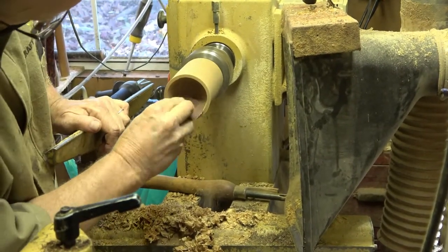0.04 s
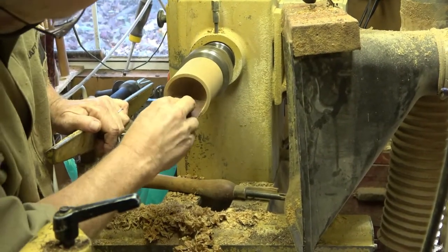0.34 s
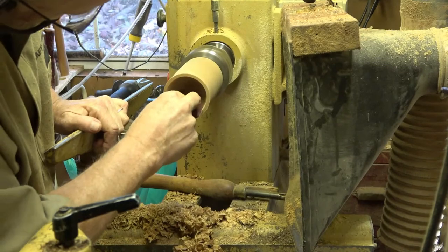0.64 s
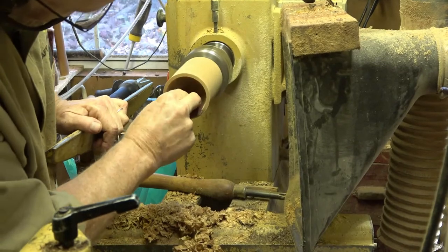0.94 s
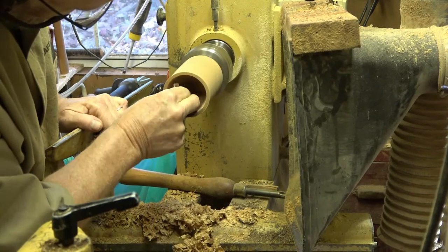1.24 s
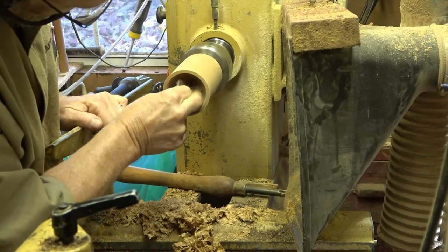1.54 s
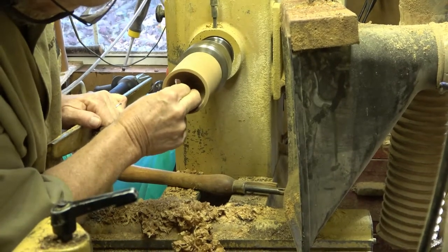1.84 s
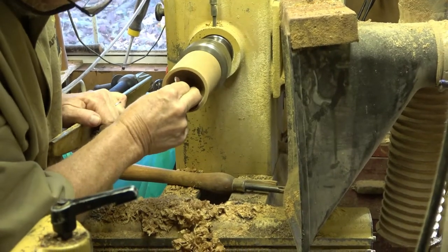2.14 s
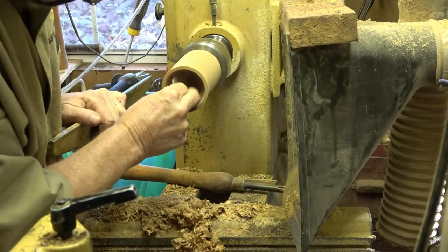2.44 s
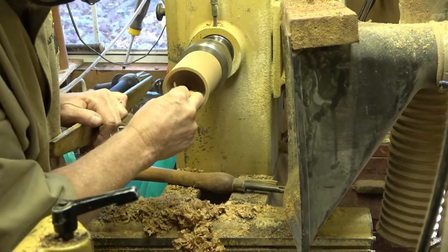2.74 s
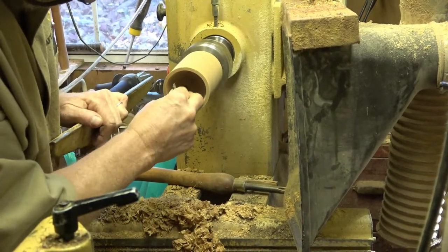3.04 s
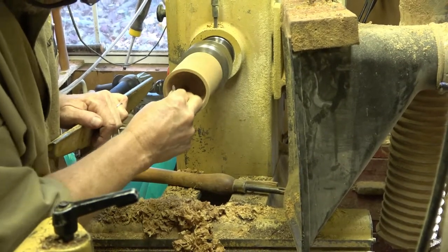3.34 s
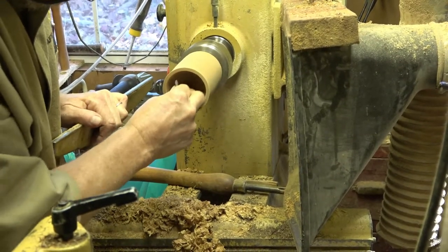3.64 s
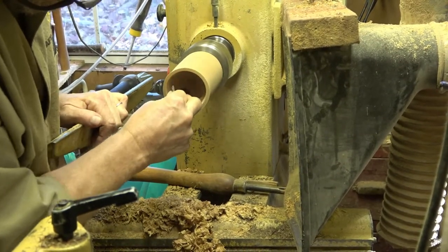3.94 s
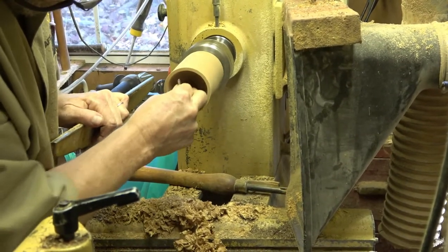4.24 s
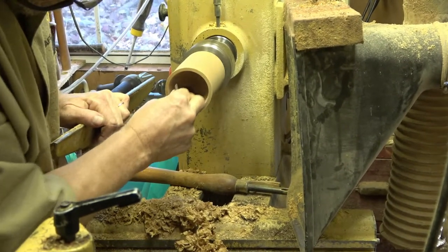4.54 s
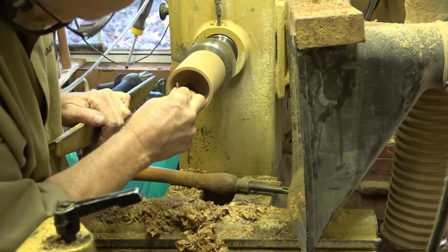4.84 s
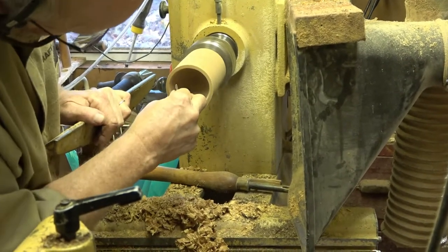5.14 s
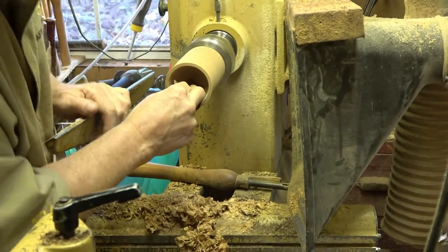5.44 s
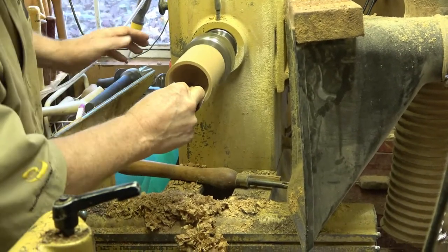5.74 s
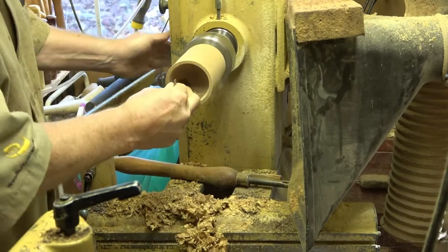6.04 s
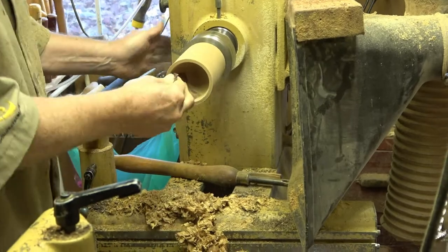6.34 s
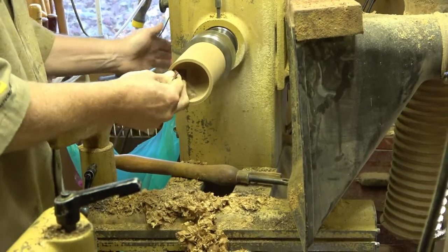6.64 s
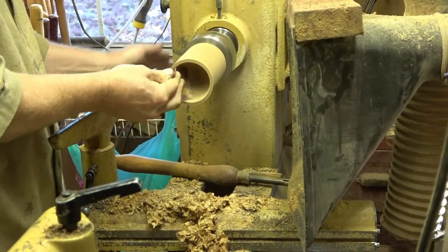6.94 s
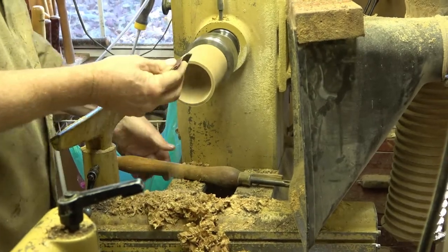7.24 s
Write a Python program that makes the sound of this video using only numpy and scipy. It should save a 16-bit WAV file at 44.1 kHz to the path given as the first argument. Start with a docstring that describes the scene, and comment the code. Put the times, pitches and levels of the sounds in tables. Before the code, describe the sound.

Folded sandpaper presses against a hollow wooden cup spinning on a lathe, making a loud, steady, gritty hiss. The thin wall rings and the tone turns throatier as the paper reaches inside, with a few brief judders when it catches. Near the end a hand knocks softly on the machine and the paper lifts off. A faint motor hum, high whine and rush of air run underneath, heard close in a small workshop.

```python
"""A gritty, hollow hiss: folded sandpaper held against a wooden cup spinning on a lathe.
The grit rings the thin wall and the air in the bore, and the paper judders when it catches inside.
Near the end the free hand knocks softly on the machine and the paper lifts off.
Under it run the lathe's motor, the whine of its speed drive and a rush of air, in a small workshop."""
import sys
import numpy as np
from scipy import signal
from scipy.fft import rfft, irfft, next_fast_len
from scipy.io import wavfile

SR = 44100
rng = np.random.default_rng(int(sys.argv[2]) if len(sys.argv) > 2 else 0)


def store_pcm(level_fs):
    """Save levels as 16-bit WAV."""
    pcm = np.round(np.clip(level_fs, -1, 1) * 32767).astype(np.int16)
    wavfile.write(sys.argv[1], SR, np.atleast_2d(pcm).T)


N = 330307
FFT_SIZE = next_fast_len(N + SR // 4, real=True)
T, HZ = np.arange(N) / SR, np.fft.rfftfreq(FFT_SIZE, 1 / SR)
BITE_S = 0.07  # paper pressed onto the wood

# where the paper bears: (time [s], reach [0 lip .. 1 deep inside])
PAPER_REACH = [(0, 0), (.5, 0.11), (.8, 1), (1.4, 0.94), (1.75, 0.83), (2.1, 0.47), (2.6, 0.54),
               (4.6, 0.48), (4.9, 0.29), (5.2, 0.0097), (5.55, 0.13), (5.9, 0.13), (7.2, 0.25)]
# hiss under the hand's force: (time [s], relative level [dB])
HAND_FORCE = [(0.1, -21.5), (1.3, -20), (1.59, -23), (1.71, -18.5), (1.73, -20), (2.0, -22), (2.33, -23.5),
              (2.58, -19.5), (2.95, -21), (3.05, -20), (3.09, -22), (3.61, -19.5), (3.85, -20),
              (5.13, -20.5), (5.24, -22.5), (5.32, -20), (5.89, -22), (7.07, -20.5)]
# finest hiss: (frequency [Hz], relative level [dB])
FINE_SPECTRUM = [(4000, -32), (6500, 2.5), (8000, 2), (10000, 0), (11000, -4.5), (12500, -7), (14000, -15),
                 (16000, -25)]
# thin wall: (frequency [Hz], width [Hz], relative level [dB])
WALL_MODES = [(2153, 170, -2), (2448, 60, -2.5), (1917, 40, -8.5), (2080, 40, -8), (2774, 123, -6)]
def sanding():
    """Grit hisses and rings the cup; each push rings wall and bore, fills the hiss and dulls its top."""
    force_db, = curves(HAND_FORCE)
    reach, = curves(PAPER_REACH)
    firmness, wall_ring, bore_ring, dull_db = pushes()
    ease_db = -9 * ramp(7.092, 0.042)  # the hand eases off
    build_db = -5 * (1 - ramp(BITE_S, 0.07))
    full = hiss(reach)
    treble = filtered(full, highpass(2870))
    body = (full - treble) * undb(-0.5 * (1 - firmness))
    coarse = (treble + body) * undb(force_db + ease_db + 1.41)
    fine_db = -23 - reach + ease_db + build_db - dull_db  # 1 dB less deep inside
    fine = shape(grit(patchy_db=2.0), undb(over_hz(FINE_SPECTRUM))) * undb(fine_db)
    wall = shape(grit(patchy_db=2.0), peaks(WALL_MODES)) * np.hypot(wall_ring, undb(-41.5 + ease_db))
    scrape = fold(scrape_db=-41 + 2.5 * firmness + ease_db)
    hollow = bore(width_hz=140.5, patchy_db=0.9) * np.hypot(bore_ring, undb(-33 + 3 * reach))
    return (coarse + fine + wall + scrape + hollow) * pressure()


# grit on wood: (frequency [Hz], relative level [dB])
HISS_SPECTRUM = [(1400, -32.5), (1850, -9.5), (2300, -2.5), (2650, 0), (3300, 1), (4500, 0), (5600, 0.5),
                 (7000, -3.5), (7900, -1.5), (9000, -7.5), (12000, -20.5)]
# cup overtones, fingers on the lip, in the bore, deep inside: (frequency [Hz], width [Hz], gain [dB])
LIP_MODES = [(2590, 89, 0), (3130, 61, 4.5), (3308, 91, 4.5), (3960, 40, -2), (3920, 56, 7), (4390, 88, 5),
             (4750, 60, 3), (5260, 96, 6.5), (5720, 80, -4), (6080, 170, 6), (6670, 160, 4)]
BORE_MODES = [(2740, 64, -8), (3180, 120, -5.5), (3430, 43, -2), (3700, 62, 4), (3990, 66, -2),
              (4160, 80, -5.5), (4540, 76, -1), (4880, 84, -1), (5790, 91, -1.5), (6140, 70, -1)]
DEEP_MODES = [(2760, 98, -8), (3260, 93, 2.5), (3690, 55, 4), (3870, 45, 1), (4140, 90, 7.5), (4450, 90, 1),
              (4960, 70, -8), (5300, 71, 0), (5970, 41, -8), (6830, 55, -2)]
def hiss(reach):
    """Grit through the cup's overtones: bright on the lip, throatier as the paper reaches in."""
    octaves = np.log2((HZ + 500) / 4000)
    out = 0
    for place, modes, tilt_db in (0, LIP_MODES, 0), (0.5, BORE_MODES, -1.36), (1, DEEP_MODES, -1.5):
        share = np.maximum(1 - 2 * np.abs(reach - place), 0)
        spectrum = undb(over_hz(HISS_SPECTRUM) + tilt_db * octaves) * (1 + peaks(modes))
        out += np.sqrt(share) * shape(grit(patchy_db=1.55), spectrum)
    return out


def grit(patchy_db):
    """Countless grains strike the wood in clumps of uneven strength."""
    return noise() * undb(patchy_db * drift(2500))


# paper against the inner wall:
# (start [s], length [s], wall ring [dB], bore ring [dB], fine hiss loss [dB])
WALL_PUSHES = [(0.034, 0.11, -23.5, -21.5, 2), (0.178, 0.37, -26.5, -25, 3), (0.55, .3, -27.5, -21.5, 3),
               (0.85, .22, -27.5, -25.5, 1.5), (1.071, 0.48, -23, -28.5, 1.5), (1.604, 0.14, -30, -40, 4.5),
               (1.767, .2, -22.5, -34.5, 2.5), (2.097, 0.17, -22.5, -35, 1), (2.28, 0.071, -24.5, -33, 1),
               (2.524, 0.31, -28, -26, 2), (2.974, .12, -27, -26.5, 3), (3.196, 0.16, -26.5, -25.5, 2.5),
               (3.395, .15, -24.5, -27.5, 3), (3.572, 0.17, -23.5, -28.5, 4.5),
               (3.793, .15, -25, -28.5, 3.5), (4.045, 0.13, -25, -26.5, 5), (4.253, 0.17, -24, -28.5, 3.5),
               (4.456, .14, -23.5, -29, 3), (4.682, .18, -24, -29, 2.5), (4.888, 0.18, -28, -34, 1.5),
               (5.324, .22, -25, -30, 3), (5.55, 0.24, -29, -35.5, 1), (6.848, 0.33, -47, -34, 1)]
def pushes():
    """The hand's pushes as firmness (0-1), wall and bore ring (gains) and fine hiss loss (dB)."""
    starts, lengths, wall_db, bore_db, loss_db = np.transpose(WALL_PUSHES)
    push = np.array([spell(start, length, edge_s=0.058) for start, length in zip(starts, lengths)])
    firmness = np.minimum(push.sum(axis=0), 1)
    return firmness, undb(wall_db) @ push, undb(bore_db) @ push, loss_db @ push


def pressure(spindle_hz=29.38):
    """Contact gain: a graze, the bite, a throb twice a turn from the slightly oval cup, the lift."""
    turns = np.cumsum(spindle_hz * (1 + 0.012 * drift(5.1))) / SR
    throb_depth = 0.03 + 0.15 * spell(1.5, 1.05, edge_s=0.2)
    throb = 1 + throb_depth * np.sin(4 * np.pi * turns)
    graze_db = -12.5 * (1 - ramp(BITE_S, 0.0044))
    lift_db = -30 * ramp(7.183, 0.063)
    return throb * undb(graze_db + lift_db + 0.41 * drift(30))


# air in the cup: (time [s], resonance [Hz])
BORE_PITCH = [(0.08, 1358), (.45, 1385), (.62, 1443), (.85, 1510), (1.05, 1457), (2.6, 1421), (2.8, 1386),
              (3.2, 1439), (5.8, 1427), (6.1, 1380), (6.55, 1414), (6.85, 1466), (7.15, 1405)]
def bore(width_hz, patchy_db):
    """Air in the cup rings in a band that moves as the hand shades the mouth."""
    centre_hz, = curves(BORE_PITCH)
    band = 1 / np.sqrt(1 + (HZ / width_hz) ** 3.9)
    phase = 2 * np.pi * np.cumsum(centre_hz) / SR
    ring = shape(noise(), band) * np.cos(phase) + shape(noise(), band) * np.sin(phase)
    return unit(ring * undb(patchy_db * drift(149)))


# scraping fold: (frequency [Hz], relative level [dB])
FOLD_SPECTRUM = [(350, -10.5), (600, -11.5), (760, -4), (930, -10.5), (1020, 6.5), (1130, -10.5),
                 (1300, -9), (1800, 1.5), (2400, -30)]
# fold snagging: (time [s], level [dB])
FOLD_SNAGS = [(0.09, -29), (2.75, -27.5), (2.87, -30.5), (3.02, -34), (3.33, -35), (3.75, -32),
              (4.17, -27.5)]
def fold(scrape_db, snag_half_s=0.025):
    """The paper's fold scrapes roughly and now and then snags."""
    snags = sum(undb(db) * np.exp(-((T - time) / snag_half_s) ** 2) for time, db in FOLD_SNAGS)
    scrape = shape(grit(patchy_db=5.5), undb(over_hz(FOLD_SPECTRUM)))
    return scrape * np.hypot(snags, undb(scrape_db))


# paper catching: (start [s], length [s], level [dB])
PAPER_CATCHES = [(1.498, 0.15, -39), (1.955, 0.13, -35.5), (2.25, .12, -36.5), (2.39, .15, -39.5),
                 (2.74, 0.097, -37), (3.233, 0.066, -47), (3.65, 0.073, -43), (4.165, 0.052, -37),
                 (4.75, 0.071, -42)]
# paper and fingertips: (frequency [Hz], width [Hz], relative level [dB])
JUDDER_MODES = [(174.9, 46, -4.5), (234, 11.5, 4.5), (338, 32, 0.5)]
def judder():
    """Paper and fingertips shudder against the bore in short spells."""
    spells = sum(undb(db) * np.exp(-(2 * (T - start) / length - 1) ** 4)
                 for start, length, db in PAPER_CATCHES)
    swing = np.tanh(0.4 * shape(noise(), peaks(JUDDER_MODES)))  # friction caps the swing
    return shape(swing, highpass(90) * (1 - highpass(580))) * spells


# knocks and brushes: (start [s], level [dB], centre [Hz], decay [s])
HAND_KNOCKS = [(6.733, -38.5, 618, 0.029), (6.733, -49, 340, 0.026), (7.16, -43, 412, 0.15),
               (7.315, -42, 2290, 0.028)]
def knocks(rise_s=0.0033):
    """The free hand bumps and brushes the machine: dull, quickly damped."""
    out = 0
    for start, db, hz, decay_s in HAND_KNOCKS:
        age = np.maximum(T - start, 0)
        envelope = undb(db) * (1 - np.exp(-age / rise_s)) * np.exp(-age / decay_s)
        out += shape(noise(), peaks([(hz, hz / 3, 0)])) * envelope
    return out


# motor with pulley, and fan: (frequency [Hz], relative level [dB])
MOTOR_TONES = [(236.9, -50.5), (355.3, -53), (446.8, -74), (662.1, -54), (710.6, -55), (769.8, -51.5),
               (877.5, -48.5), (1050, -63)]
FAN_TONES = [(60, -64.5), (91, -61.5), (153, -61), (226, -54.5), (268, -54.5), (1240, -48)]
def lathe():
    """Wavering motor and fan tones and the speed drive's narrow whine."""
    tones = 0
    for hz, db in [*MOTOR_TONES, *FAN_TONES]:
        phase = 2 * np.pi * np.cumsum(hz + 3.46 * drift(13.79)) / SR
        tones += np.sqrt(2) * undb(db - 3.5 + 3.93 * drift(14)) * np.sin(phase)
    whine = shape(noise(), peaks([(10140, 141, -1), (10100, 580, -12)])) * undb(-47.5)
    return tones + whine


# rushing air: (frequency [Hz], relative level [dB])
AIR_SPECTRUM = [(25, -9), (60, -8), (100, 2.5), (170, -1.5), (260, -1), (380, 3), (470, -2), (850, 3),
                (1300, 2), (2000, -7.5), (4000, -11), (8000, -14), (12000, -29), (16000, -33)]
def air():
    """A steady rush of air whose lowest rumble differs left and right."""
    spectrum = undb(over_hz(AIR_SPECTRUM))
    rush = shape(noise(), spectrum) * undb(-43.5 + 0.5 * drift(5.7))
    rumble = np.array([shape(noise(), spectrum / (1 + (HZ / 170) ** 2)) for channel in range(2)])
    return rush + undb(-58.5) * rumble


def hand_echoes(x, echo_db, drift_hz, count=14):
    """Add 1-10 ms echoes between cup, hand and arm; their strengths wander as the fingers move."""
    lags = rng.integers(SR // 1000, SR // 100, count)
    echoes = sum(np.pad(x, (lag, 0))[:N] * drift(drift_hz) for lag in lags)
    return x + undb(echo_db) * echoes / np.sqrt(count)


def reflections(x, t60_s):
    """Scatter from benches and walls, as strong as its source."""
    age = T[:SR // 2]
    envelope = (1 - np.exp(-age / 0.01)) * np.exp(-np.log(1000) * age / t60_s)
    tail = rng.standard_normal(len(age)) * envelope
    return signal.fftconvolve(x, tail / np.sqrt(np.sum(tail ** 2)))[:N]


# stereo balance: (frequency [Hz], left minus right [dB])
STEREO_BALANCE = [(60, -10), (110, 0), (200, -2.5), (380, 2.5), (700, 0.5), (1290, -4), (2380, -4.0),
                  (4400, -3.5), (8120, 1.5), (15000, 2.5)]
# channel likeness: (frequency [Hz], squared coherence [0-1])
STEREO_LIKENESS = [(60, 0.85), (130, 0.92), (290, 1), (640, 0.97), (1410, 0.99), (3100, 0.98), (6820, 0.93),
                   (15000, 0.86)]
# stereo phase: (frequency [Hz], left's lead [rad])
STEREO_LEAD = [(0, -1.03), (5080, 0.12), (8180, 0.73), (15600, 0.45)]
def workshop(near):
    """The room's scatter makes left and right differ at both ends of the spectrum."""
    mid = rfft(near + undb(-22.5) * reflections(near, t60_s=0.34), FFT_SIZE)
    coherence = np.sqrt(np.clip(over_hz(STEREO_LIKENESS), 0, 1))
    side = rfft(reflections(near, t60_s=0.32), FFT_SIZE) * np.sqrt((1 - coherence) / (1 + coherence))
    lean = undb(over_hz(STEREO_BALANCE) / 2) * np.exp(0.5j * over_hz(STEREO_LEAD))
    return irfft(np.array([(mid + side) * lean, (mid - side) / lean]), FFT_SIZE)[:, :N]


def undb(db):
    """Decibels to gain."""
    return 10 ** (np.asarray(db) / 20)


def unit(x):
    """Scale to rms 1."""
    return x / np.sqrt(np.mean(x ** 2))


def noise():
    """White noise."""
    return rng.standard_normal(N)


def drift(rate_hz):
    """Random wander with spread near 1, turning about rate_hz times a second."""
    levels = rng.standard_normal(N // 4)
    return 1.216 * np.interp(T * 2 * rate_hz, np.arange(len(levels)), levels)


def ramp(start_s, length_s):
    """Linear rise from 0 to 1."""
    return np.clip((T - start_s) / length_s, 0, 1)


def spell(start_s, length_s, edge_s):
    """Attack, hold and release; start and length are at half height."""
    return ramp(start_s - edge_s / 2, edge_s) - ramp(start_s + length_s - edge_s / 2, edge_s)


def curves(table):
    """Each value column of a time table, per sample."""
    times, *columns = np.transpose(table)
    return [np.interp(T, times, column) for column in columns]


def over_hz(table):
    """A frequency table on a log axis, per bin."""
    hz, value = np.transpose(table)
    return np.interp(np.log(HZ + 1), np.log(hz + 1), value)


def peaks(modes):
    """Gain per bin of steep-skirted resonances: (frequency [Hz], width [Hz], gain [dB])."""
    return np.sqrt(sum((undb(db) / (1 + 2 * ((HZ - hz) / width) ** 2)) ** 2 for hz, width, db in modes))


def highpass(hz):
    """Gain per bin of a steep high-pass."""
    return HZ ** 4 / (HZ ** 4 + hz ** 4)


def filtered(x, gain):
    """Filter by a gain per bin."""
    return irfft(rfft(x, FFT_SIZE) * gain, FFT_SIZE)[:N]


def shape(x, gain):
    """Filter, then scale to rms 1."""
    return unit(filtered(x, gain))


def scene():
    """Sanding and lathe close by in the workshop, over rushing air."""
    rub = filtered(sanding(), highpass(150))  # the sanding carries almost no bass
    cup = undb(-0.57) * hand_echoes(rub, echo_db=-10.5, drift_hz=1.095)
    return workshop(cup + judder() + knocks() + lathe()) + air()


def record(dry):
    """Round the tallest peaks and cut the top."""
    ceiling, top_hz = 0.66, 15600
    rounded = dry / (1 + (dry / ceiling) ** 6) ** (1 / 6)
    return signal.sosfilt(signal.ellip(10, 0.1, 80, top_hz, fs=SR, output="sos"), rounded)


dry = scene()
out = record(dry)
store_pcm(out)
```